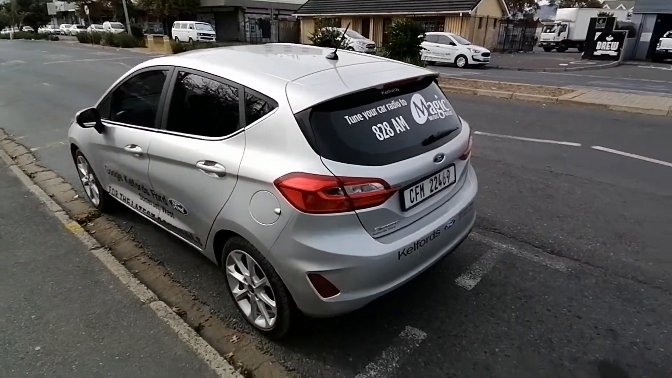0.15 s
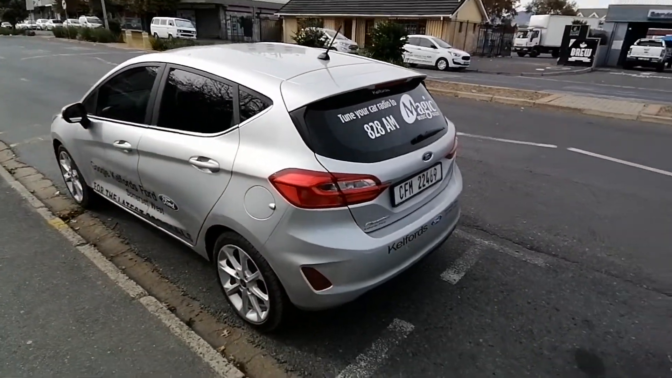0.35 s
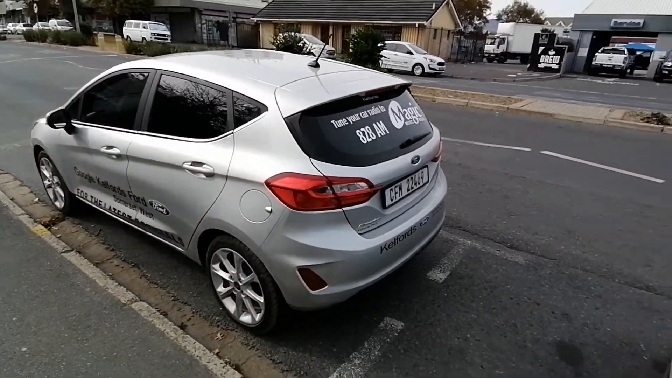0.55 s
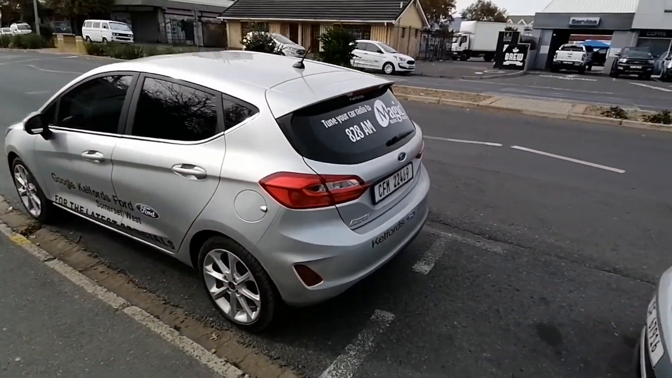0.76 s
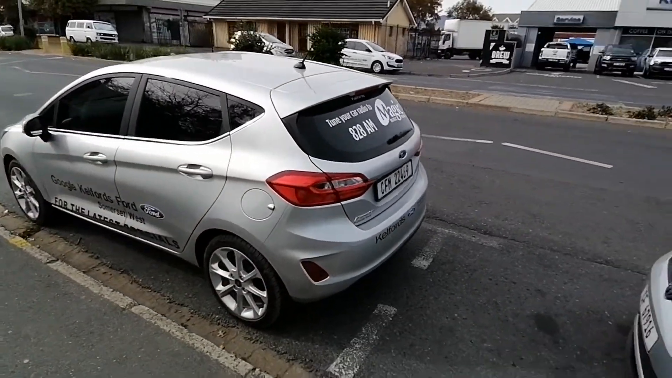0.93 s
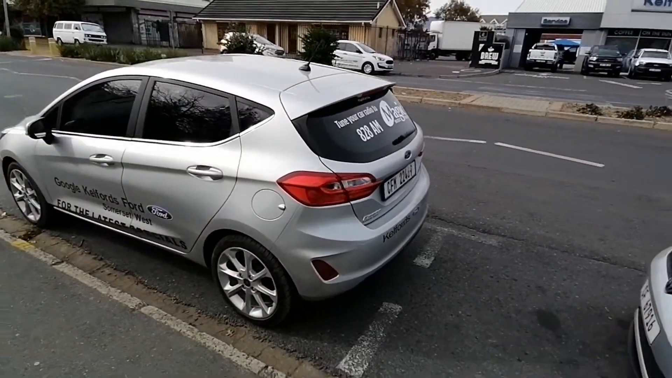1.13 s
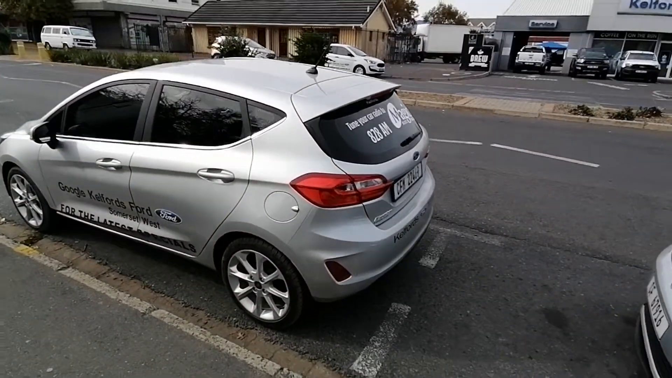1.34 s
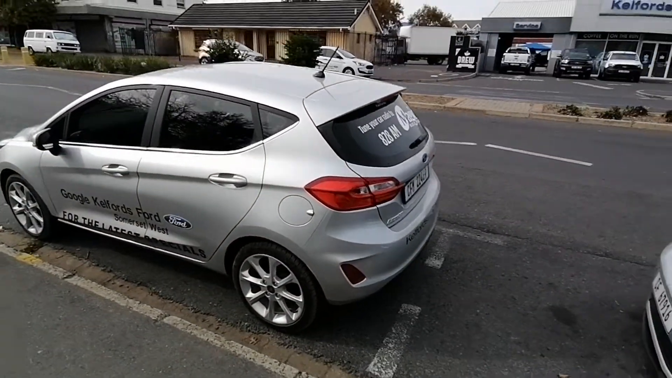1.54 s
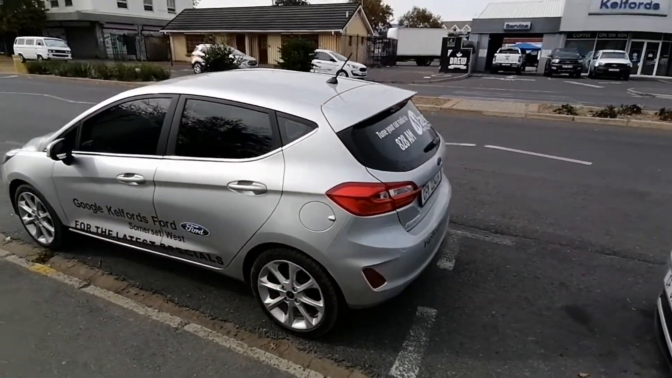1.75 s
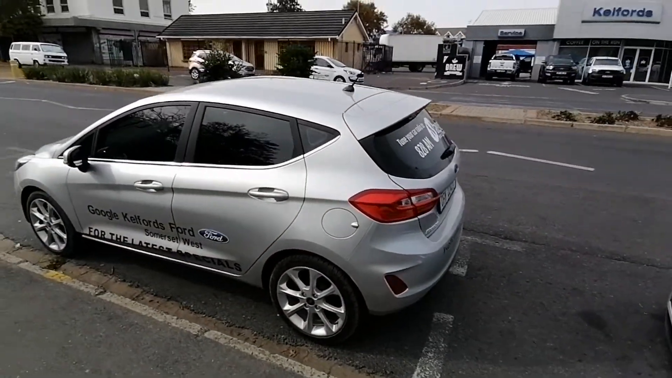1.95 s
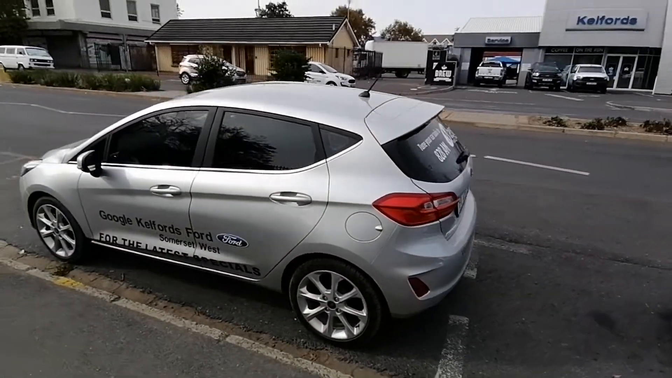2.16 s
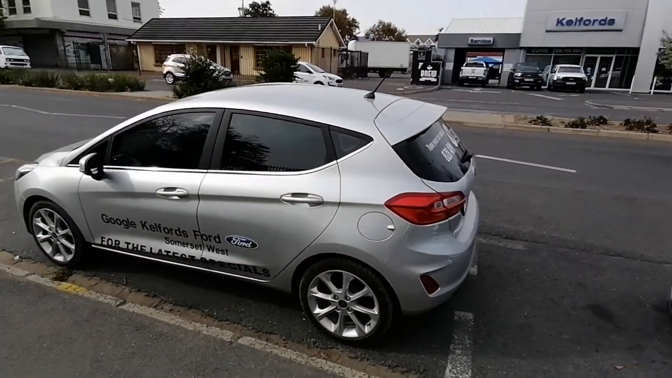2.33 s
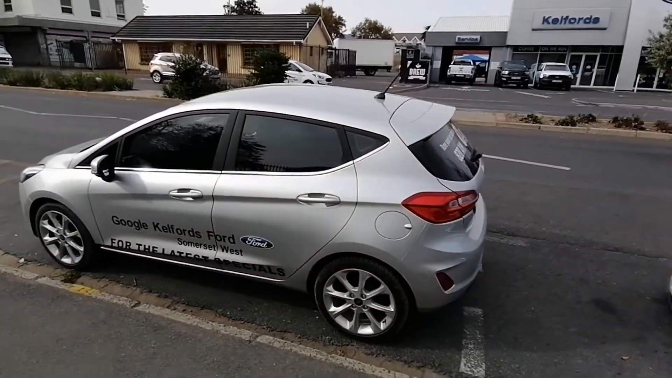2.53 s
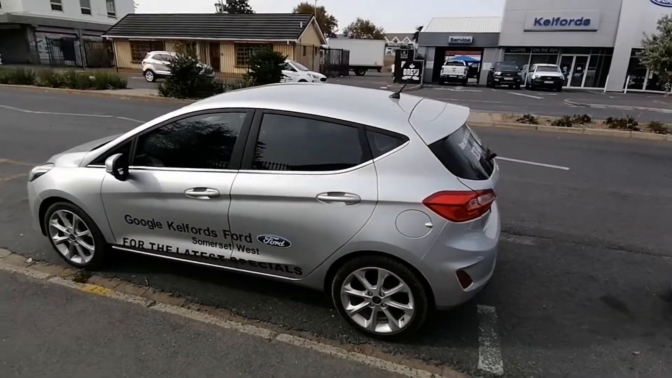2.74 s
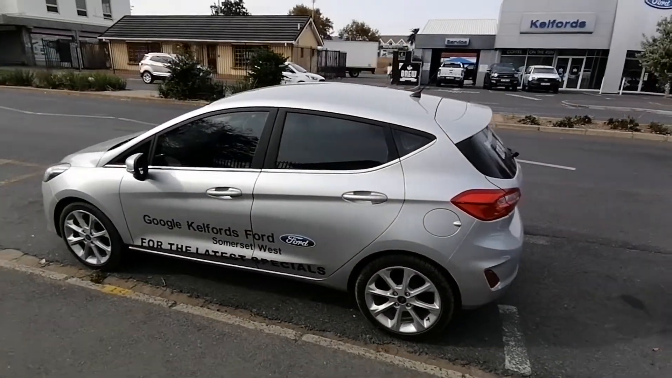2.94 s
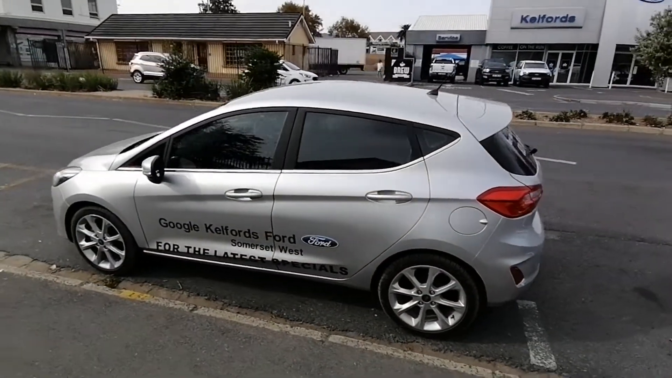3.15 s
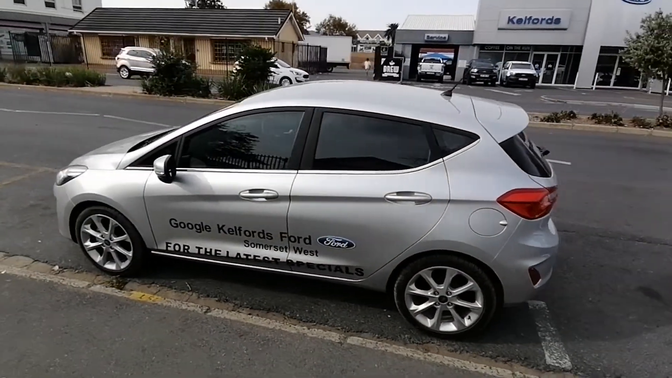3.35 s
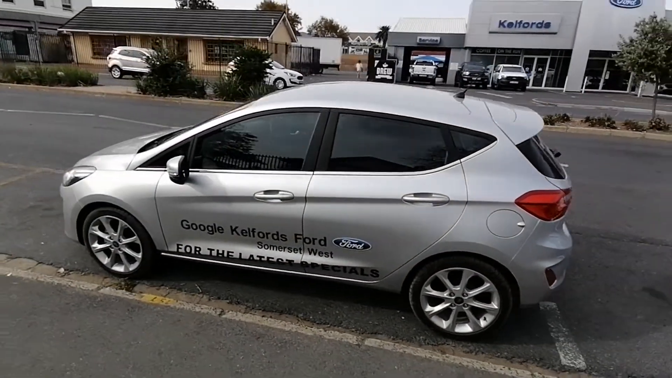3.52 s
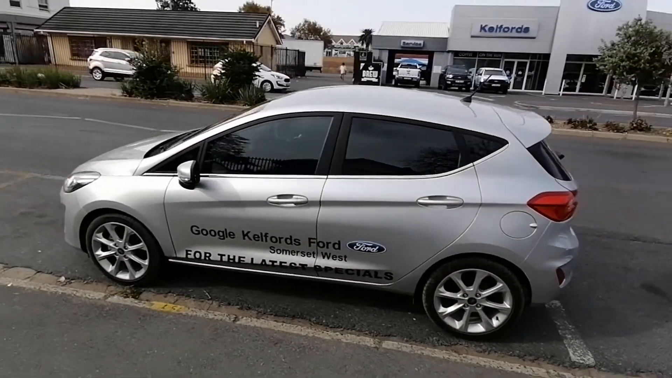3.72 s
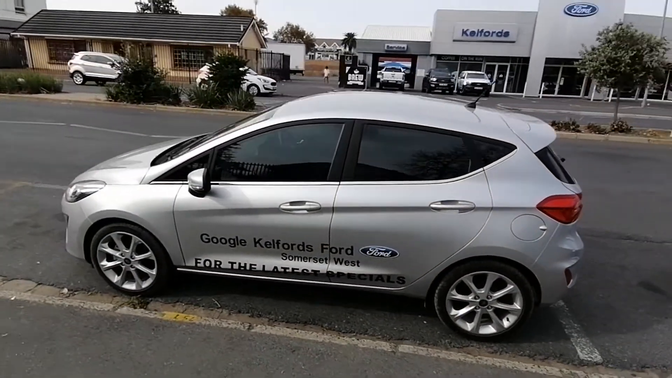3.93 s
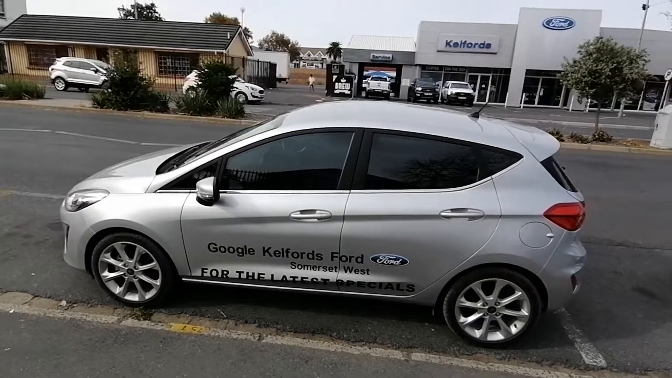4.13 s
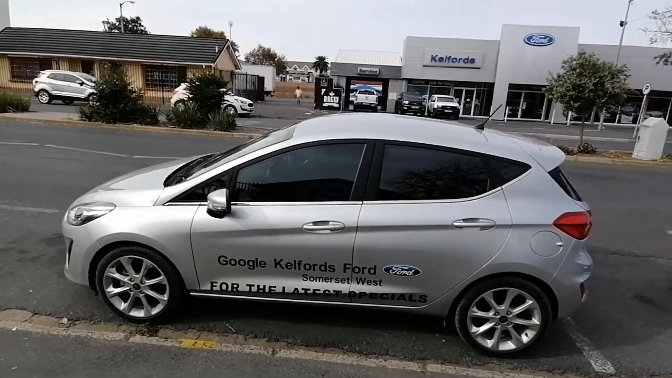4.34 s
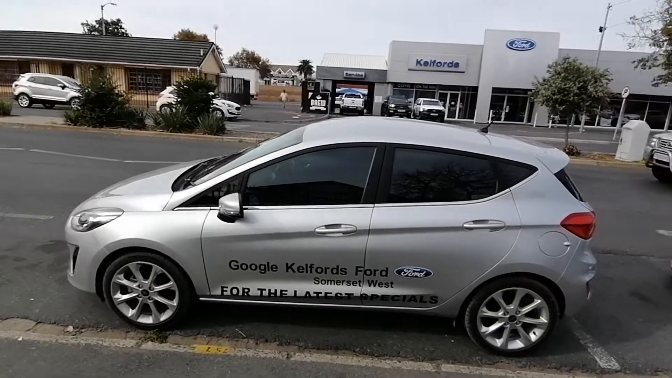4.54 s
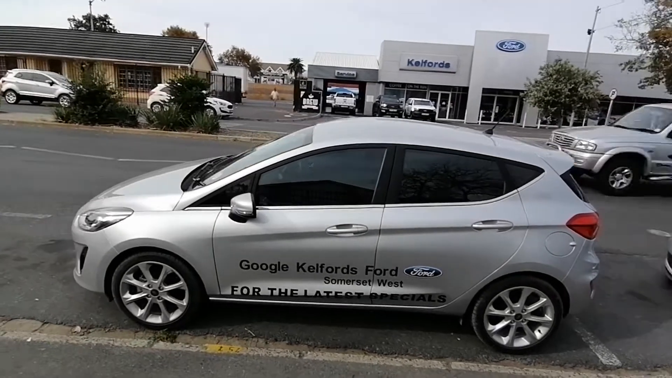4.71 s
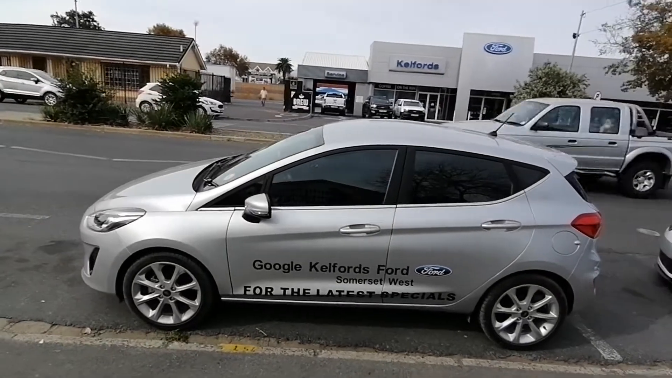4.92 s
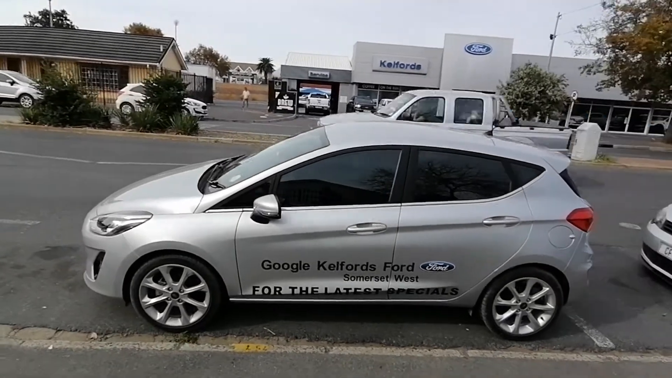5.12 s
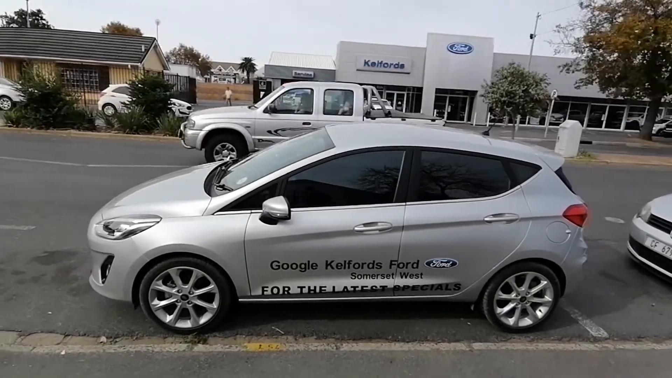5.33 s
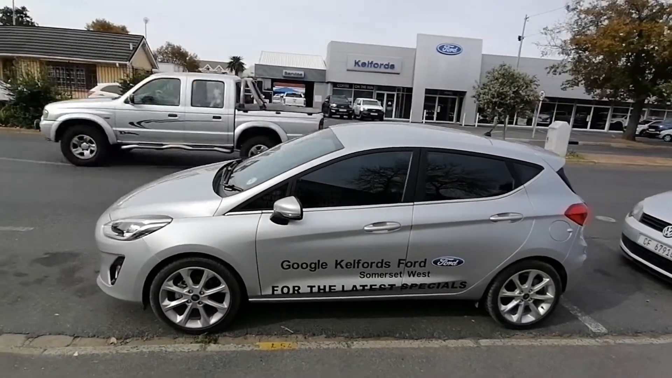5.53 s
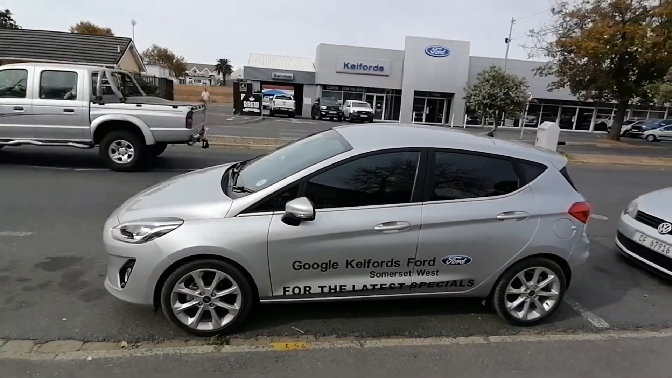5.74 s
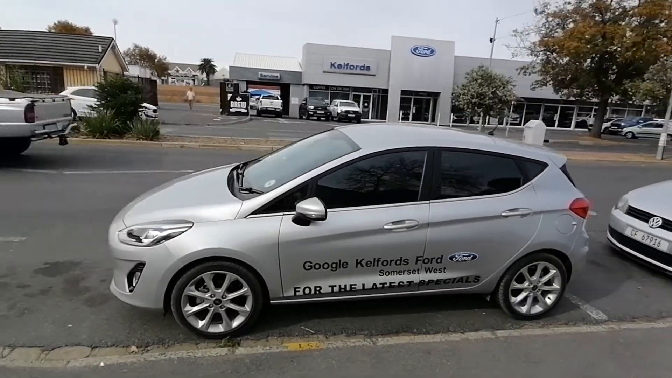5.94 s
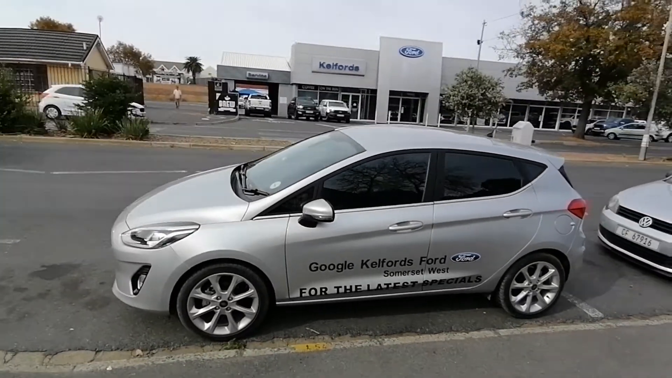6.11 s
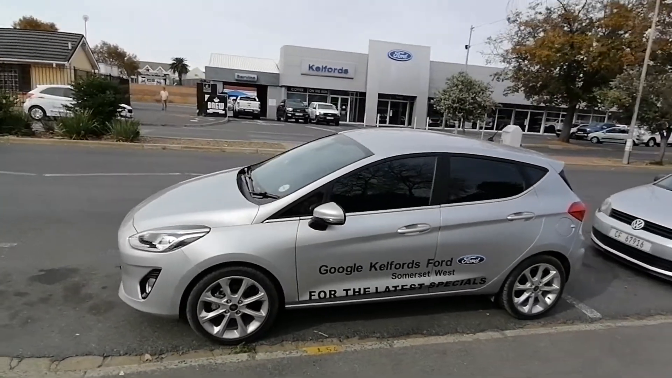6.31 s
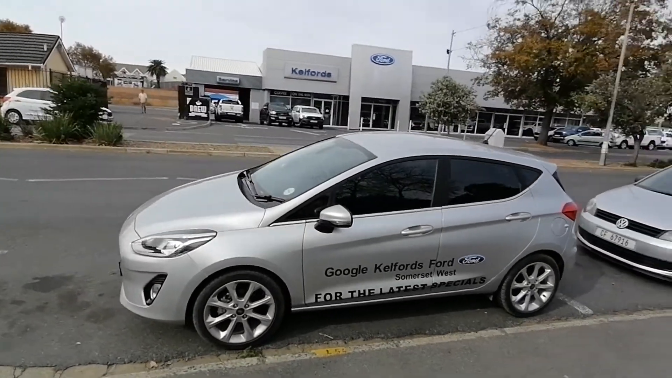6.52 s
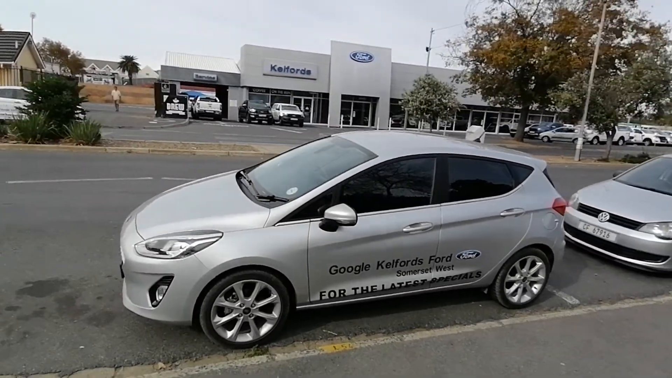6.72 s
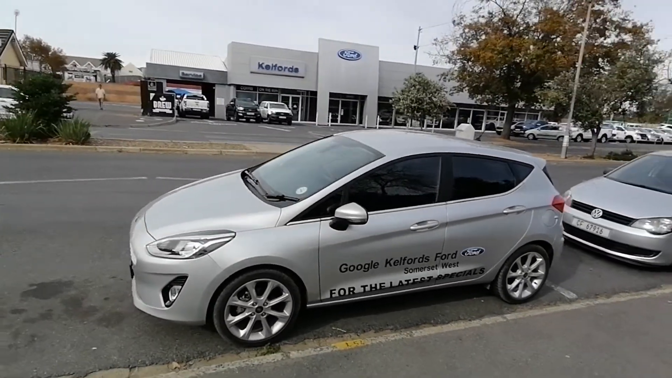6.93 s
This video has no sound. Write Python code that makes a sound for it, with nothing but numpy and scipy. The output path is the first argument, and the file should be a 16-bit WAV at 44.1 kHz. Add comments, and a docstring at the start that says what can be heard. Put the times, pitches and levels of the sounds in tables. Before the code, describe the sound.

A fixed-distance roadside listener hears mono street ambience with little extreme treble: deep rumble, distant traffic wash and brief tyre whooshes. Tiny fluttering bird whistles come in scattered clusters with a short street echo, while a low idle fades out. A diesel pickup approaches with wavering hum and boomy swells, draws level late, then knocks, ticks and throbs strongly as it starts to recede.

```python
"""First comes a town street: rumble, a tyre whoosh and a nearby idling engine, then a small bird chirping.
A diesel pickup drives up, passes about eleven metres away and drives on, its exhaust booming in swells.
The exhaust is three wavering tones; knock and injector clatter are noise bursts at the firing rate.
Tyres and traffic are coloured noise, and the bird's bending whistles echo between the house fronts."""
import sys
import numpy as np
from scipy import signal
from scipy.fft import rfft, irfft, next_fast_len
from scipy.io import wavfile
from scipy.ndimage import uniform_filter1d

SR = 44100
rng = np.random.default_rng(int(sys.argv[2]) if len(sys.argv) > 2 else 0)


def file_out(sig):
    """Save sig as 16-bit WAV at sys.argv[1]."""
    # one column per channel
    cols = np.atleast_2d(sig).T
    # limit, then scale
    lim = np.clip(cols, -1, 1)
    pcm = np.round(lim * 32767).astype(np.int16)
    wavfile.write(sys.argv[1], SR, pcm)


N = 311787
TIME = np.arange(N) / SR  # seconds


# The pickup's engine speed. Each row: time in seconds, firing rate in Hz.
FIRING_RATE = [(0, 67.2), (.95, 75.3), (1.13, 66.7), (1.33, 63.24), (1.7, 60.7), (2.7, 67.5), (3.8, 67.5),
               (4.5, 65.3), (5.9, 63.25), (6.55, 65.75), (7.07, 68.2)]


def firing_turns():
    """Counts the engine's firings; a slight random unevenness keeps the rate from being perfect."""
    firing_hz = curves(FIRING_RATE)[0] * (1 + 0.0067 * drift(11))
    return np.cumsum(firing_hz) / SR


# The pickup drives by at a steady speed.
CLOSEST_S, SPEED_M_PER_S, DISTANCE_M = 5.97, 8.9, 10.87


def approach_db(falloff):
    """Level of the pickup against its closest point; a falloff of one is spreading in open air."""
    metres = np.hypot(DISTANCE_M, SPEED_M_PER_S * (TIME - CLOSEST_S))
    return 20 * falloff * np.log10(DISTANCE_M / metres)


# The exhaust's hum at the closest point, before it wavers: 1st, 2nd and 3rd harmonic in dB.
HUM_LEVELS = [-40.5, -46, -49]
# Booming swells. Each row: middle in seconds, half length in seconds, then
# the 1st, 2nd and 3rd harmonic in dB.
BOOM_SWELLS = [(0.49, 0.11, -52, -44, -53.5), (1.257, 0.12, -42.5, -34.5, -69),
               (1.66, 0.17, -55, -41.5, -56), (2.141, 0.12, -49, -39.5, -52),
               (2.332, 0.082, -37.5, -40.5, -66), (2.685, 0.22, -58, -37, -66),
               (3.096, 0.12, -64, -38, -70), (3.804, 0.32, -46, -46, -50), (4.852, 0.15, -33.5, -56, -55),
               (5.09, 0.21, -33.5, -37, -41), (5.508, 0.11, -37, -46.5, -41),
               (6.306, 0.41, -58.5, -22.5, -35.5), (6.883, 0.13, -38.5, -27.5, -45.5)]
# The deepest note of the hum dips just after the pickup draws level.
SHADE_S, SHADE_HALF_S, SHADE_DB = 6.25, 0.29, -3.5


def exhaust(turns, rough=0.34, throb=0.071, waver_db=1.96, steady_db=-34):
    """Firing harmonics hum and boom, steadier when loud; unequal cylinders make them throb."""
    tones = np.zeros(N)
    near_db = approach_db(falloff=0.67)
    shade_db = SHADE_DB * swell(SHADE_S, SHADE_HALF_S, steep=4.0)
    for k, hum_db in enumerate(HUM_LEVELS, 1):
        level_db = hum_db + near_db * np.sqrt(k) + waver_db * drift(5)
        if k == 1:
            level_db = level_db + shade_db
        power = amp(level_db) ** 2
        for middle_s, half_s, *boom_db in BOOM_SWELLS:
            power = power + (amp(boom_db[k - 1]) * swell(middle_s, half_s, steep=5.0)) ** 2
        unsteady = rough / (1 + np.sqrt(power) / amp(steady_db))
        tone = np.sin(2 * np.pi * (k * turns + rng.random()))
        tones += np.sqrt(2 * power) * (1 + unsteady * drift(14)) * tone
    # one throb every four firings
    return tones * (1 + throb * np.sin(np.pi * turns / 2))


def bursts(turns, decay, between, uneven_db, rise=0.11):
    """One burst of noise a firing, unequal in strength; rise and decay are in firings."""
    firing, age = turns.astype(int), turns % 1
    chance = np.clip(rng.standard_normal(N), -1, 1)[firing]
    strength_db = uneven_db * (chance + np.cos(np.pi * firing / 2))
    shape = (1 - np.exp(-(age / rise) ** 2)) * np.exp(-age / decay)
    # "between" is the steady noise under the bursts
    return noise() * (between + amp(strength_db) * shape / shape.max())


# Colours of the knock as the pickup shows its nose, its flank and its tail.
# Each row: frequency in Hz, relative level in dB.
NOSE_COLOUR = [(800, -56), (1300, -22), (1460, -8), (1630, -14.5), (1950, 9.5), (2150, -9), (2400, 12.5),
               (2550, 4), (2900, -7), (3800, -7), (4300, -13), (5500, -13.5), (6300, -31.5), (9000, -58)]
FLANK_COLOUR = [(750, -38.5), (1230, -22), (1540, -3), (1750, -4.5), (2020, 4), (2300, -3.5), (2540, -5),
                (2950, -17.5), (3400, -14), (4100, -10), (5400, -20.5), (6200, -41), (9000, -55.5)]
TAIL_COLOUR = [(750, -47), (1300, -12), (1720, 6), (1980, 1.5), (2270, 8), (2520, -1), (2800, -17.5),
               (3800, 3.5), (4800, -26), (5500, -21), (6200, -36), (9000, -60.5)]
# Four times in seconds: the nose view begins to fade, the flank is all that shows,
# the flank begins to fade, the tail is all that shows.
FACING_TIMES = [5.95, 6.08, 6.64, 6.76]
# The knock swells once the pickup clears the parked car.
KNOCK_S, KNOCK_HALF_S, KNOCK_DB = 6.35, 0.74, -41


def knock(turns, nose_db=-2.0, flank_db=0.5, tail_db=-.5):
    """Combustion knocks the block; the body shades the sound as the pickup goes by."""
    nose = np.interp(TIME, FACING_TIMES[:2], [1, 0])
    tail = np.interp(TIME, FACING_TIMES[2:], [0, 1])
    flank = np.clip(1 - nose - tail, 0, 1)
    views = [(nose, NOSE_COLOUR, nose_db), (flank, FLANK_COLOUR, flank_db), (tail, TAIL_COLOUR, tail_db)]
    drive = patchy(bursts(turns, decay=0.97, between=1.0, uneven_db=-0.5), depth_db=0.2)
    level = amp(KNOCK_DB) * swell(KNOCK_S, KNOCK_HALF_S, steep=9.0)
    return level * sum(amp(db) * np.sqrt(share) * coloured(drive, colour) for share, colour, db in views)


# Bands of the injector ticks favoured by the ground reflection, which swell, slide upward and fade. Each row:
# middle in seconds, half length in seconds, frequency at the middle in Hz, slide in Hz per second, level in dB.
TICK_BANDS = [(6.222, 0.24, 4010, 1200, -49.5), (6.45, .27, 4973, 900, -52), (6.843, 0.15, 3990, 300, -49)]


def injectors(turns, width_hz=460):
    """A tick at each firing; its reflection off the ground favours bands that slide upward."""
    drive = patchy(bursts(turns, decay=.16, between=.09, uneven_db=1.2, rise=.18), depth_db=1.4)
    out = np.zeros(N)
    for middle_s, half_s, hz, slide, db in TICK_BANDS:
        band_hz = hz + slide * np.clip(TIME - middle_s, -2 * half_s, 2 * half_s)
        out += amp(db) * swell(middle_s, half_s, steep=3.9) * resonate(drive, band_hz, width_hz)
    return out


def clink(start_s=6.501, hz=4300, db=-39, decay_s=.005, width_hz=1300):
    """A jolt rings a small loose metal part on the pickup: resonant noise that dies away at once."""
    fade = (TIME > start_s) * np.exp(-abs(TIME - start_s) / decay_s)
    return amp(db) * fade * resonate(noise(), np.full(N, hz), width_hz)


# Colours of the casing rumble, the tread roar and the groove hiss.
# Each row: frequency in Hz, relative level in dB.
CASING_COLOUR = [(120, -36), (190, -5), (235, 3), (280, 3), (350, 0), (450, -4.5), (600, -20), (1200, -60)]
ROAR_COLOUR = [(250, -34), (420, -2.5), (560, 3), (720, 1), (920, 0.5), (1050, -5.5), (1330, -6.5),
               (1600, -16.5), (2100, -37), (3500, -83.5)]
HISS_COLOUR = [(2500, -32), (3200, -1.5), (4400, 0.5), (5200, -2), (6200, -4.5), (6900, -1), (7400, -10.5),
               (8000, -10)]
# How the hiss rises and falls. Each row: time in seconds, level in dB before hiss_db is added.
HISS_RISE_AND_FALL = [(0, -79), (1.8, -80.5), (3.15, -66), (4.35, -72), (4.8, -63.5), (5.15, -72.5),
                      (5.85, -55.5), (6.6, -59.5), (7.07, -64)]


def tyres(body_db=-45.0, roar_db=-44.0, hiss_db=5.5):
    """Casing rumble and tread roar grow as the pickup nears; air hisses from the grooves."""
    casing = coloured(patchy(noise(), depth_db=0.83), CASING_COLOUR)
    roar = coloured(patchy(noise(), depth_db=1.5), ROAR_COLOUR)
    hiss = coloured(patchy(noise(), depth_db=3.0), HISS_COLOUR)
    return (amp(body_db + approach_db(falloff=0.8)) * casing
            + amp(roar_db + approach_db(falloff=1.035)) * roar
            + amp(hiss_db + curves(HISS_RISE_AND_FALL)[0]) * hiss)


# Broad whooshes of tyres going by. Each row: middle in seconds, half length in seconds,
# tread hum in Hz, hum level in dB, wash level in dB, hiss in Hz, hiss level in dB.
TYRE_WHOOSHES = [(0.098, 0.25, 300, -48.5, -60.5, 954, -62.5), (2.25, .25, 705, -61, -72.5, 1880, -60.5),
                 (3.13, 0.091, 690, -68, -59, 2900, -57), (3.312, 0.19, 680, -52, -64, 5850, -69.5),
                 (3.85, 0.45, 340, -50, -64.5, 1940, -63), (4.8, .35, 327, -51, -64, 1226, -52.5),
                 (4.794, 0.13, 730, -44.5, -50.5, 6580, -62.5), (5.98, 0.31, 875, -47, -55.5, 5430, -63),
                 (6.6, 0.23, 488, -46, -50.5, 6930, -61)]
# Colour of their wash. Each row: frequency in Hz, relative level in dB.
WHOOSH_WASH_COLOUR = [(400, -28), (1000, 0), (1450, -2.5), (1900, -1), (2500, 5), (3080, -1), (3500, -8.5),
                      (5000, -16.5), (8000, -35)]


def whooshes(hum_width_hz=330, hiss_width_hz=750):
    """Tread hum, wash and hiss swell and fade together like a bell curve."""
    out = np.zeros(N)
    wash = coloured(patchy(noise(), depth_db=4.5), WHOOSH_WASH_COLOUR)
    for middle_s, half_s, hum_hz, hum_db, wash_db, hiss_hz, hiss_db in TYRE_WHOOSHES:
        hum = amp(hum_db) * resonate(noise(), np.full(N, hum_hz), hum_width_hz)
        hiss = amp(hiss_db) * resonate(noise(), np.full(N, hiss_hz), hiss_width_hz)
        bell = np.exp(-((TIME - middle_s) / half_s) ** 2 / 2)
        out += bell * (hum + amp(wash_db) * wash + hiss)
    return out


# The bird's notes. Each row: start in seconds, length in seconds, start, middle and end pitch in Hz
# (before the wobble), level in dB against the other notes.
BIRD_NOTES = [(0.668, 0.015, 4770, 5300, 6700, -60.5), (0.684, 0.058, 4410, 4050, 3770, -60),
              (0.72, 0.025, 3820, 3420, 3000, -55), (0.818, 0.05, 4270, 4350, 3700, -56),
              (0.852, 0.023, 3260, 3610, 4280, -52.5), (0.871, 0.026, 4070, 3400, 3000, -58),
              (1.043, 0.036, 4610, 4500, 5220, -58), (1.106, 0.026, 5040, 4870, 4600, -55.5),
              (1.447, .03, 4100, 4000, 3870, -59), (1.488, 0.018, 3970, 4650, 5740, -60.5),
              (1.505, 0.04, 3810, 3000, 2570, -54.5), (1.54, 0.013, 2670, 2930, 3260, -58),
              (1.9, 0.045, 3630, 4620, 3600, -60), (1.918, 0.017, 4900, 5180, 4900, -59),
              (1.968, 0.019, 4052, 4780, 4630, -53), (2.014, .03, 3650, 4100, 4200, -65),
              (2.233, 0.02, 3940, 4100, 3620, -62.5), (2.258, 0.031, 3730, 3500, 2950, -57),
              (2.37, 0.025, 4140, 4420, 3800, -53), (2.396, 0.027, 3630, 3940, 3100, -52.5),
              (2.84, 0.027, 4300, 4900, 5200, -62), (2.92, 0.024, 4900, 4724, 4680, -61),
              (3.067, 0.022, 3980, 3990, 3900, -57), (3.116, 0.021, 5050, 3680, 2800, -56),
              (4.104, 0.036, 3700, 3910, 3100, -57), (4.239, 0.027, 4060, 4450, 3770, -56),
              (4.277, 0.02, 4070, 3770, 3250, -54), (4.437, 0.072, 4980, 5370, 4530, -57)]


def bird():
    """Each note is a fluttering whistle that bends through three pitches."""
    out = np.zeros(N)
    wobble, flutter = 1 + .025 * drift(480), amp(3 * drift(180))
    for s, length, start, middle, end, db in BIRD_NOTES:
        at = np.arange(int(s * SR), int((s + length) * SR))
        u = np.linspace(-1, 1, len(at))  # from start to end of the note
        hz = middle + u * (end - start) / 2 + u ** 2 * ((start + end) / 2 - middle)
        whistle = np.sin(2 * np.pi * np.cumsum(hz * wobble[at]) / SR)
        out[at] += amp(db) * evened(flutter[at] * np.sqrt(1 - u ** 2) * whistle)
    return out


def street_echo(x, t60=0.35, wet_db=0, early=.03):
    """Scattered reflections: a quick cluster from walls and parked cars, then a tail down the street."""
    t = TIME[:SR]
    fade = amp(-60 * t / t60) + np.exp(-t / early)
    hits = rng.random(SR) < 1800 / SR  # about 1800 reflections a second
    taps = rng.standard_normal(SR) * hits * (t > .004) * fade
    return 1.28 * x + amp(wet_db) * signal.fftconvolve(x, taps / np.linalg.norm(taps))[:N]


# Level of the traffic's wash. Each row: time in seconds, level in dB.
WASH_RISE_AND_FALL = [(0, -57.5), (.65, -62), (2.2, -56.5), (4.2, -53.5), (4.8, -52), (7.07, -48)]
# Colour of the traffic along the street. Each row: frequency in Hz, relative level in dB.
WASH_COLOUR = [(650, -33), (1100, -11), (1270, -5), (1390, -2), (1490, 2.5), (1740, 2.5), (2550, 1),
               (3350, -8.5), (3920, -8.5), (4970, -18.5), (5860, -13.5), (6500, -25), (8450, -40),
               (14300, -120)]
# Level of the deep street rumble. Each row: time in seconds, level in dB.
RUMBLE_RISE_AND_FALL = [(0, -36), (.5, -44.5), (2.7, -45), (3.7, -42.5), (4.4, -44), (4.9, -36),
                        (5.6, -41.5), (7.07, -41)]
# Colour of the rumble. Each row: frequency in Hz, relative level in dB.
DEEP_COLOUR = [(12, -19.5), (25, -6.5), (50, 2), (80, 2), (120, -3), (170, 1.5), (260, -16.5), (500, -55.5)]
# An engine idles nearby, then begins to stop and fades out.
IDLE_DB, IDLE_STOP_S, IDLE_FADE_S = -49.5, 2.35, 0.22


def traffic(idle_hz=32.7):
    """The street's wash and rumble are coloured noise; an idling engine is one low, unsteady tone."""
    wash = amp(curves(WASH_RISE_AND_FALL)[0]) * coloured(patchy(noise(), depth_db=1.0), WASH_COLOUR)
    rumble = amp(curves(RUMBLE_RISE_AND_FALL)[0]) * coloured(noise(), DEEP_COLOUR)
    running = np.clip((IDLE_STOP_S - TIME) / IDLE_FADE_S + 1, 0, 1)
    idle_turns = np.cumsum(idle_hz * (1 + 0.012 * drift(3.2))) / SR
    idle = amp(IDLE_DB) * running * np.sqrt(2) * np.sin(2 * np.pi * idle_turns)
    return wash + rumble + idle


def amp(db):
    """Decibels to gain."""
    return 10 ** (np.asarray(db) / 20)


def evened(x):
    """Scales to an rms of one."""
    return x / np.sqrt(np.mean(x ** 2) + 1e-20)


def curves(rows):
    """Each column of a table, after the times, as a curve over time."""
    s, *columns = np.transpose(rows)
    return [np.interp(TIME, s, c) for c in columns]


def swell(middle, half, steep):
    """A gain that rises, holds and falls around its middle."""
    return 1 / (1 + abs((TIME - middle) / half) ** steep)


def noise():
    """White noise."""
    return rng.standard_normal(N)


def drift(per_s):
    """Smooth random wandering with an rms of one; a larger per_s (Hz) wanders faster."""
    smoothing = 1 + (np.fft.rfftfreq(N, 1 / SR) / per_s) ** 4
    return evened(irfft(rfft(noise()) / smoothing, N))


def coloured(x, points):
    """Gives a sound a spectrum, at an rms of one."""
    hz, db = np.transpose(points)
    f = np.fft.rfftfreq(2 * N, 1 / SR)
    gain = amp(np.interp(np.log(f + 1), np.log(hz + 1), db))
    size = next_fast_len(2 * N)  # room for the sound plus silence
    gain = np.interp(np.fft.rfftfreq(size, 1 / SR), f, gain)
    return evened(irfft(rfft(x, size) * gain, size)[:N])


def patchy(x, depth_db):
    """Lets patches of the spectrum swell and fade, as reflections shift."""
    z = signal.stft(x, nperseg=1024, noverlap=768)[2]
    patches = uniform_filter1d(rng.standard_normal(z.shape), size=7, axis=0)  # smooth over pitch
    patches = evened(uniform_filter1d(patches, size=24, axis=1))  # smooth over time
    return evened(signal.istft(z * amp(depth_db * patches), nperseg=1024, noverlap=768)[1][:N])


def resonate(x, hz, width_hz):
    """A narrow band that follows the curve hz, at an rms of one."""
    turn = np.exp(2j * np.pi * np.cumsum(hz) / SR)
    r = np.exp(-np.pi * width_hz / SR)
    # shift the band down to zero Hz, smooth it there, shift it back up
    smooth = signal.lfilter([(1 - r) ** 2], [1, -2 * r, r * r], x / turn)
    return evened((turn * smooth).real)


def scene():
    """The pickup, the street and the bird."""
    turns = firing_turns()
    pickup = exhaust(turns) + knock(turns) + injectors(turns) + clink() + tyres()
    echoing_bird = amp(-5.5) * street_echo(bird())
    return (pickup + whooshes() + echoing_bird + traffic())[None]


def record(dry, edge_hz=7540):
    """A steep low-pass filter takes away the treble above the edge."""
    low_pass = signal.firwin(281, edge_hz, window=("kaiser", 8), fs=SR)
    return signal.oaconvolve(dry, low_pass[None], "same")


dry = scene()
out = record(dry)
file_out(out)
```